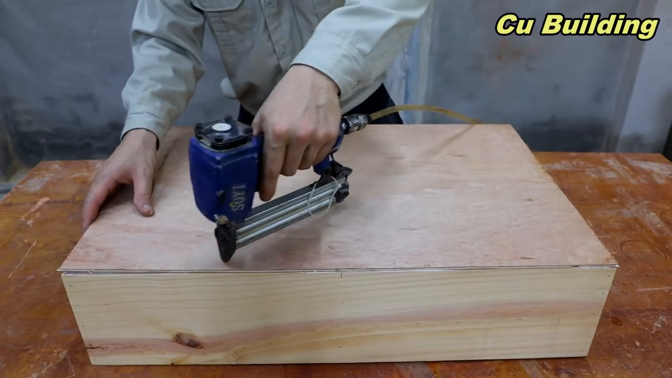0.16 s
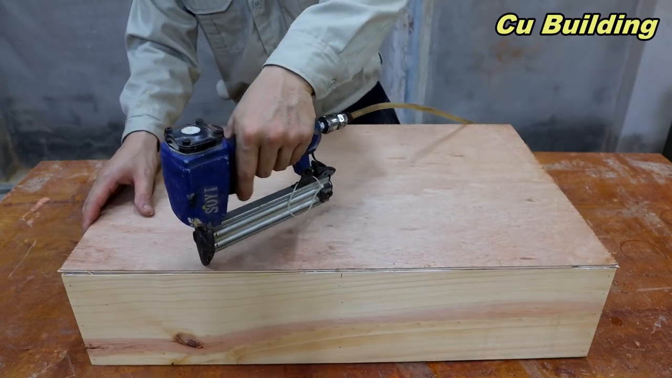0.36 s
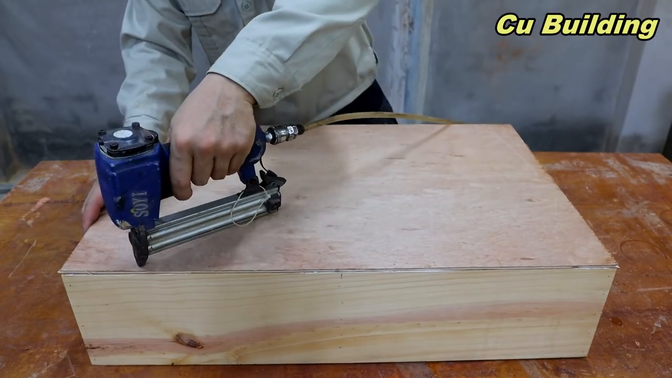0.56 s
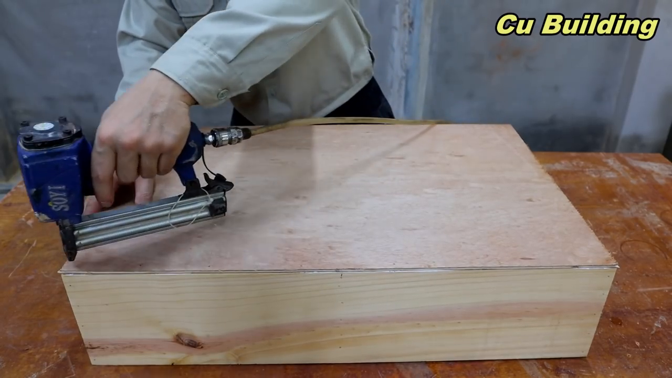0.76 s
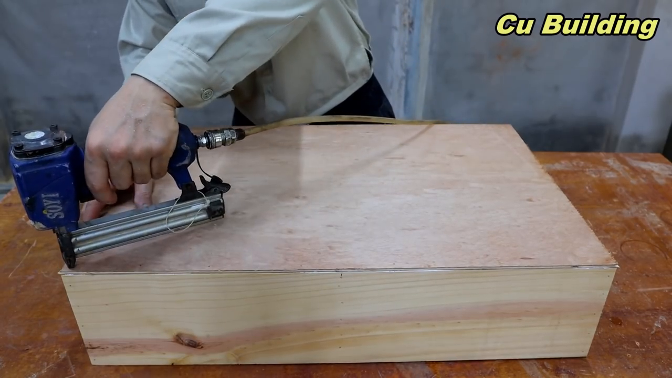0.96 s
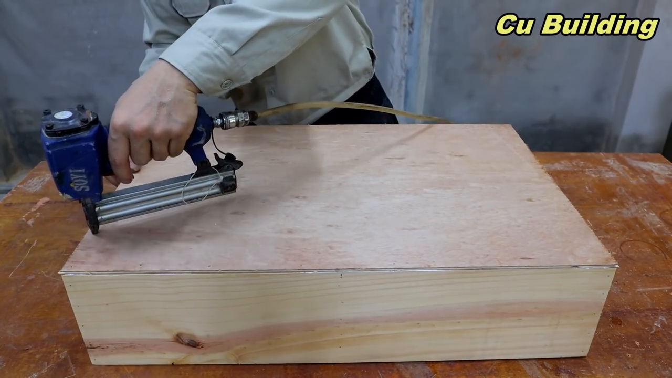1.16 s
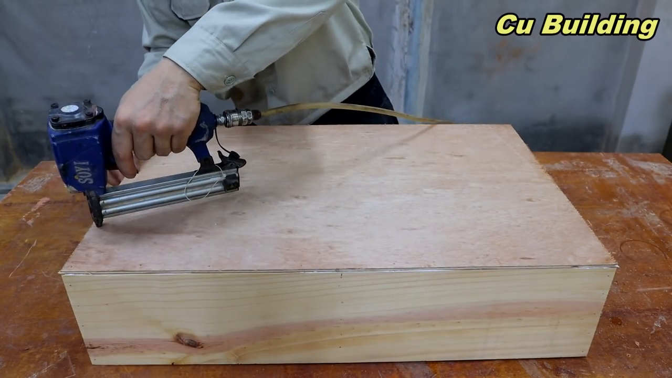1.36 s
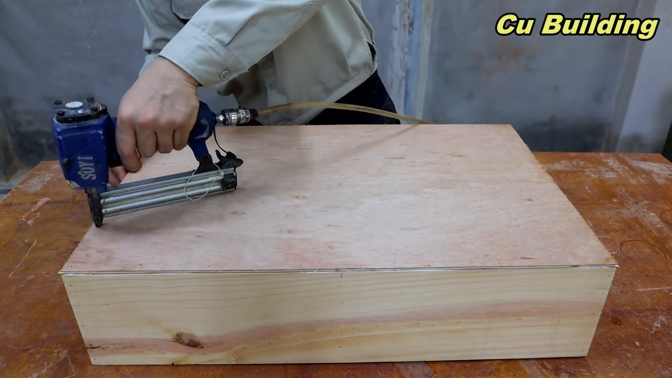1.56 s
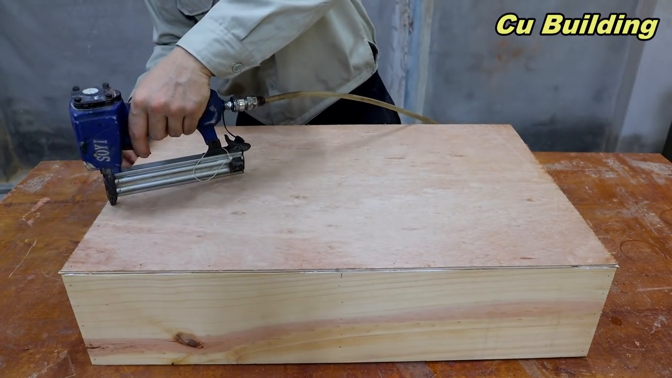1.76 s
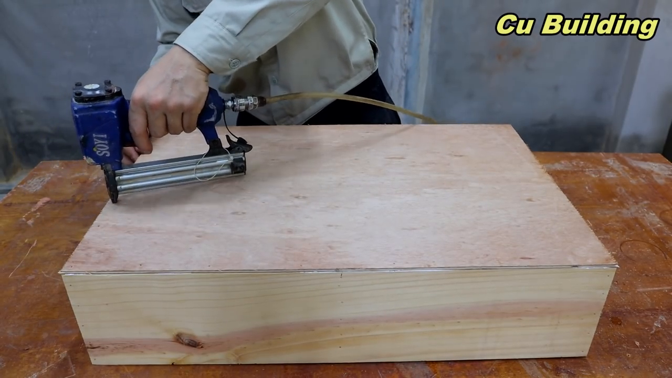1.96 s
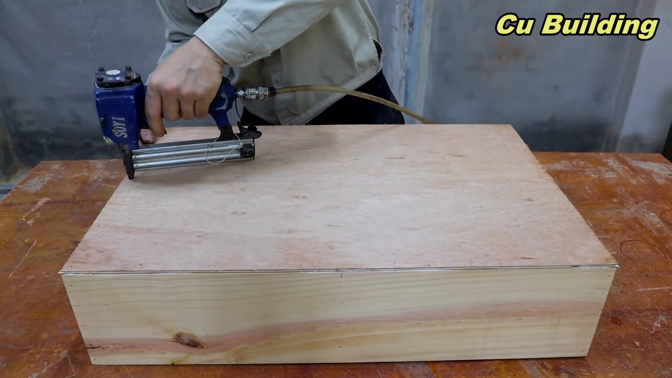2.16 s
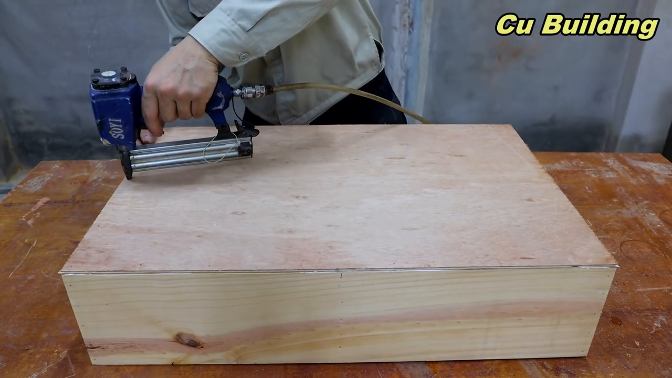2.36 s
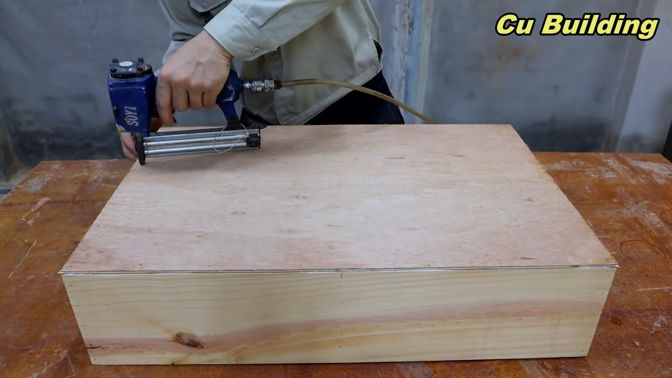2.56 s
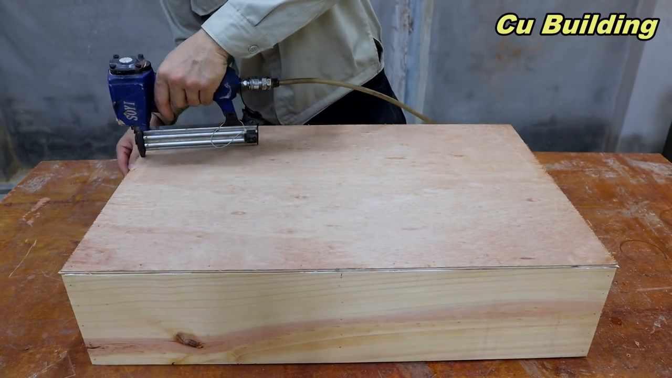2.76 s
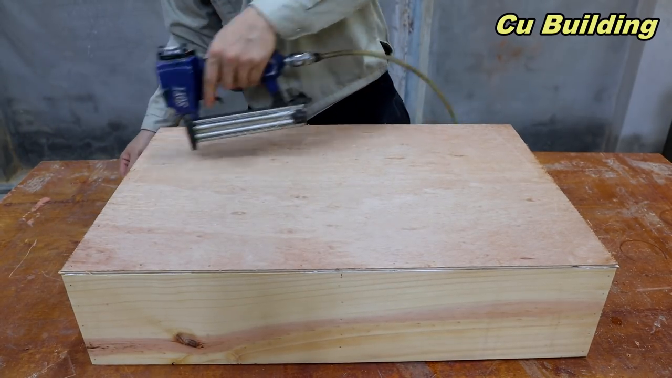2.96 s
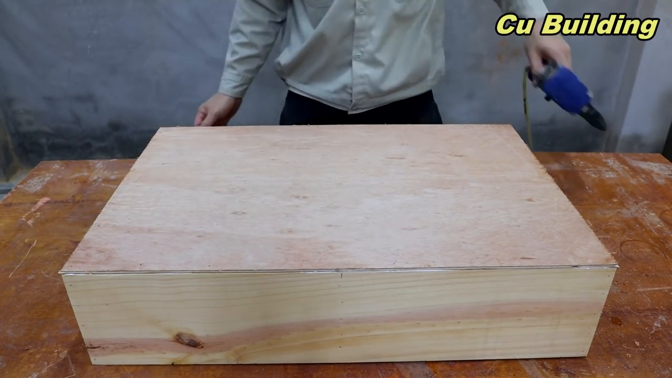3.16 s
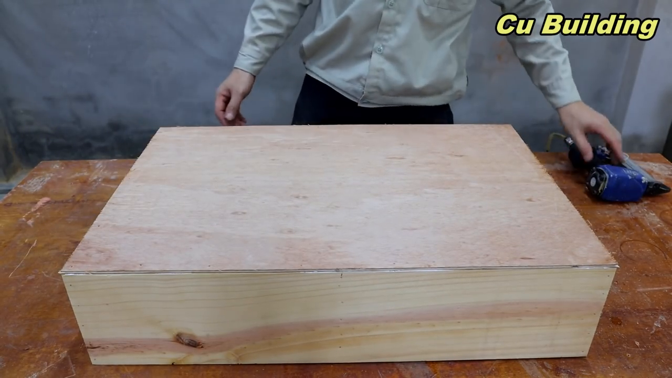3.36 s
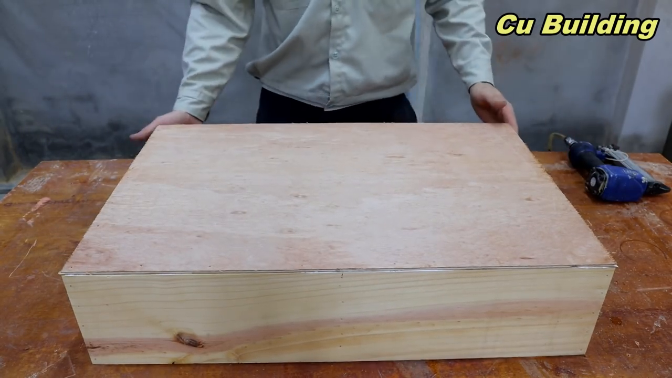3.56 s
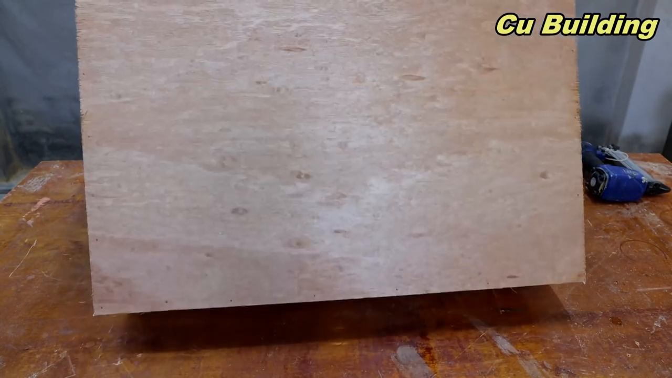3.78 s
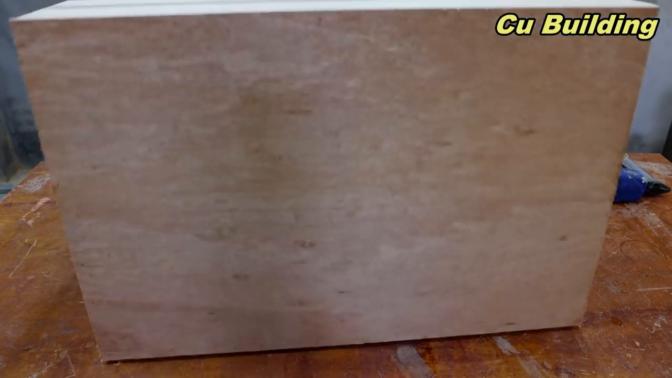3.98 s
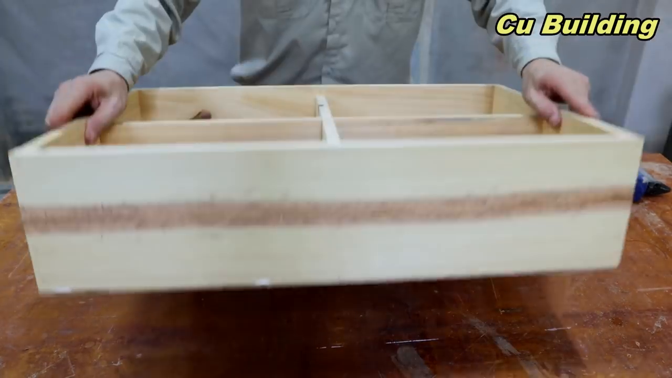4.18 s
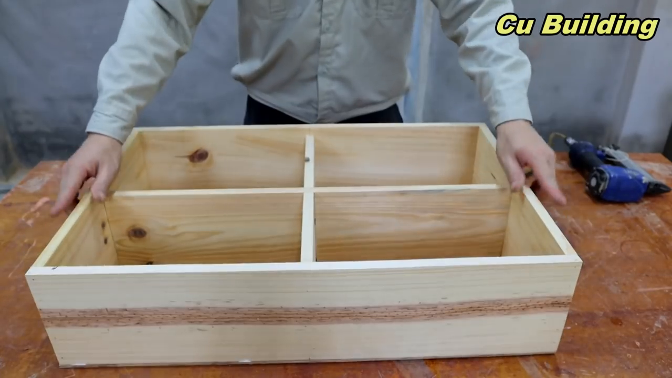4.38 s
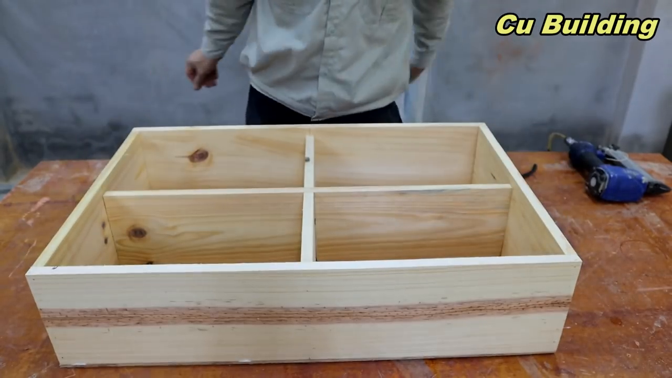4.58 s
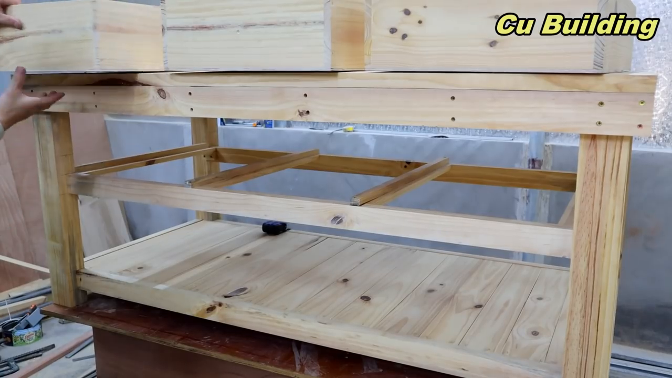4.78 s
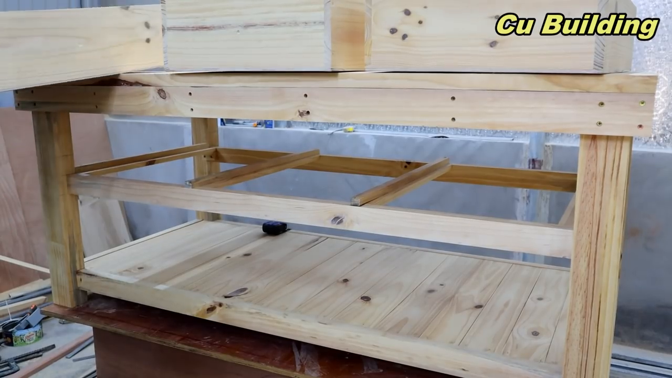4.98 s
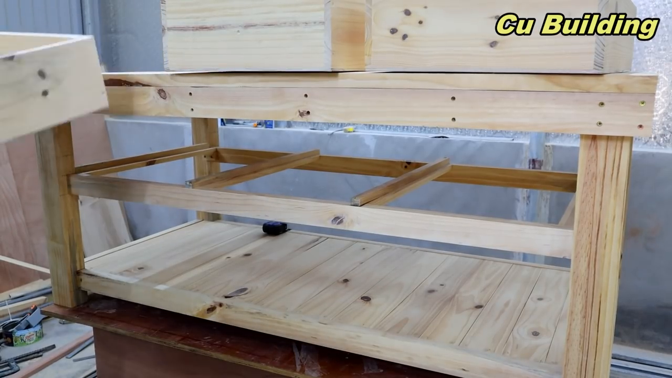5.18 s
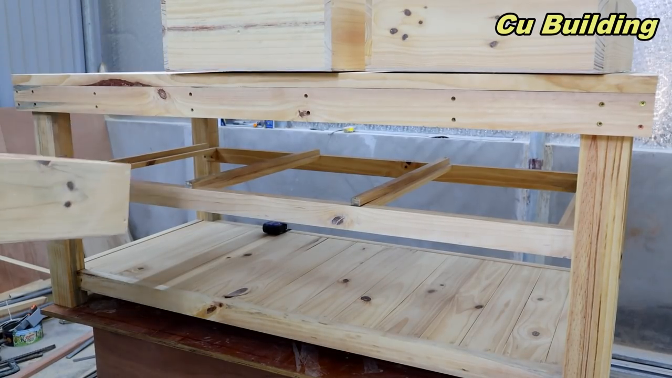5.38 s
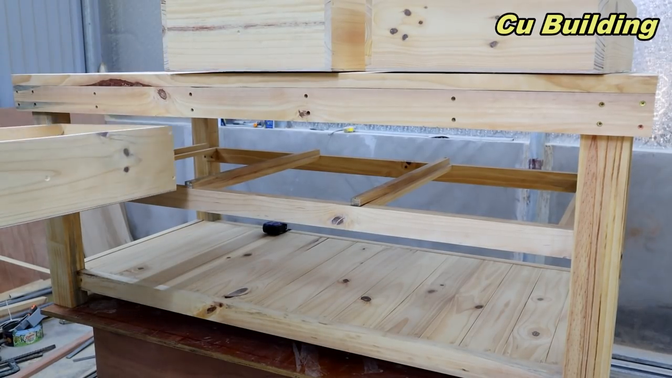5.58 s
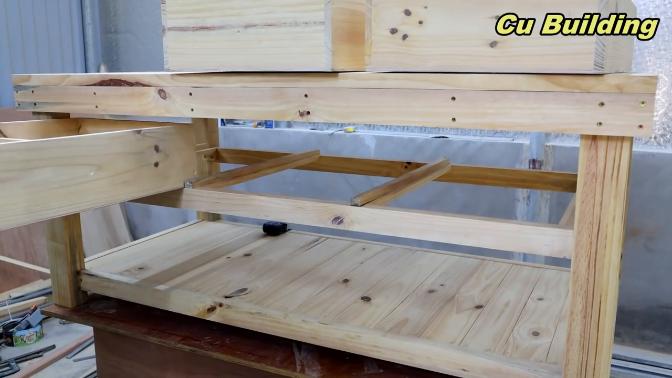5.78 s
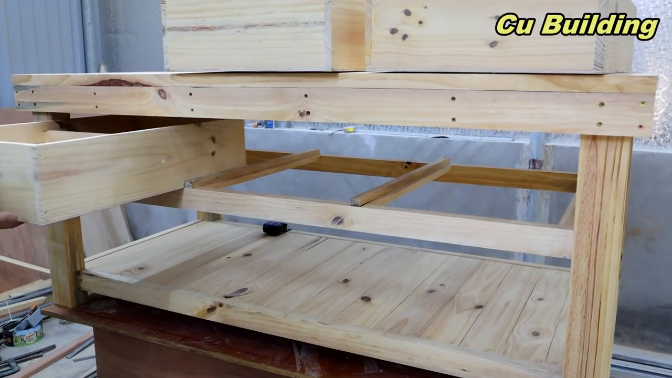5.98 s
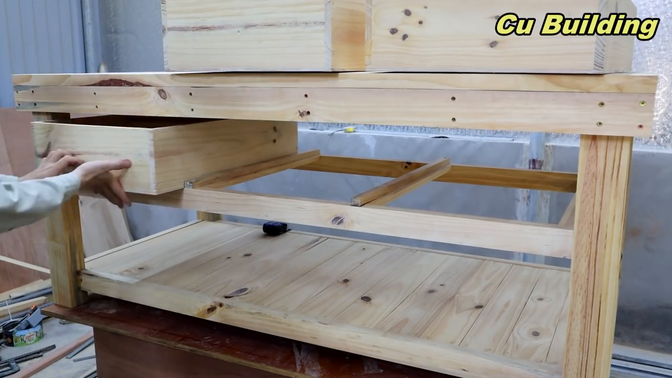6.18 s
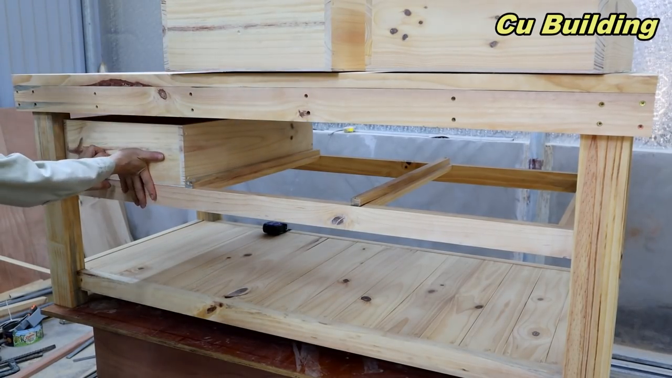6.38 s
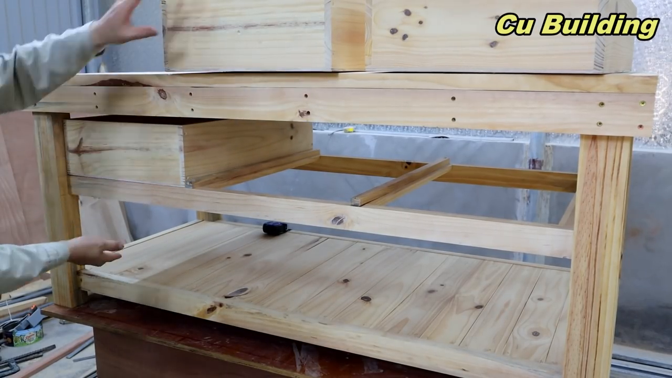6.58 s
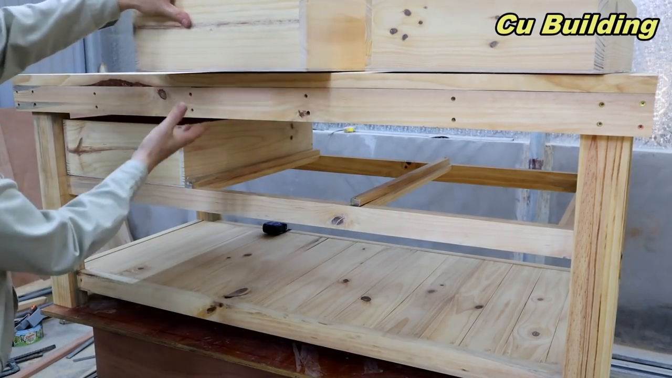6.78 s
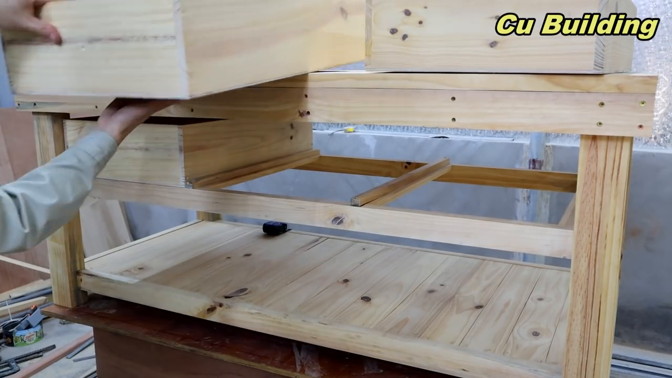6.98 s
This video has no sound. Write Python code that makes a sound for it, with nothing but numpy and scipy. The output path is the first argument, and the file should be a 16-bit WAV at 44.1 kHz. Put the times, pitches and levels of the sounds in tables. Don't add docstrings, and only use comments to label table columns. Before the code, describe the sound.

Eight sharp air-nailer shots crack into a hollow wooden box, then the tool clatters down and a drawer knocks and scrapes into its frame.

```python
import sys
import numpy as np
from scipy import signal
from scipy.fft import rfft, irfft, next_fast_len
from scipy.io import wavfile
from scipy.ndimage import map_coordinates

SR = 44100
rng = np.random.default_rng(int(sys.argv[2]) if len(sys.argv) > 2 else 0)


def waveform_to_disk(signal):
    frames = np.transpose(np.atleast_2d(signal))
    scaled = np.clip(frames, -1, 1) * 32767
    samples = np.round(scaled).astype(np.int16)
    wavfile.write(sys.argv[1], SR, samples)


def undo_db(level):
    steps = np.asarray(level, float) / 20
    return 10 ** steps


N = 310464


def unit(x):
    return x / np.sqrt(np.mean(x[0] ** 2) + 1e-20)


def along(points, hz):
    f, v = np.transpose(points)
    return np.interp(np.log(hz + 1), np.log(f + 1), v)


def filtered(x, response):
    m = next_fast_len(N + 8192)
    spectrum = rfft(x, m) * response(np.fft.rfftfreq(m, 1 / SR))
    return irfft(spectrum, m)[..., :N]


def wobble(rate):
    knots = rng.standard_normal(int(N * rate / SR) + 4)
    return map_coordinates(knots, [np.arange(N) * rate / SR])


def noise(spectrum):
    return unit(filtered(rng.standard_normal((2, N)), lambda hz: undo_db(along(spectrum, hz))))


def modes(table, grain_db):
    grains = rng.standard_normal((2, N)) * undo_db(grain_db * wobble(300))

    def body(f):
        total = 0
        for centre, width, db in table:
            damping = 1j * f * width
            total = total + undo_db(db) * (damping / (centre * centre - f * f + damping)) ** 2
        return total

    return unit(filtered(grains, body))


def bursts(times, db, t60, rise):
    power, t = np.zeros(N + SR), np.arange(SR // 3) / SR
    for s, level, fall in np.broadcast(times, db, t60):
        onset = (1 - np.exp(-t / rise)) ** 2
        power[round(s * SR):][:len(t)] += undo_db(2 * (level - 60 * t / fall)) * onset
    return np.sqrt(power[:N])


def swells(times, db, swell_s, fade_s):
    step = 32
    t = np.arange(0, N, step) / SR - np.asarray(times)[:, None]
    before = np.maximum(swell_s, .005)[:, None]
    after = np.maximum(fade_s, .005)[:, None]
    power = undo_db(-40 * np.abs(t) / np.where(t < 0, before, after))
    return lambda tilt_db: np.sqrt(undo_db(2 * (db + tilt_db)) @ power).repeat(step)[:N]


def strikes(times, db, push_s, hz, t60, ring):
    out, t = np.zeros(N + SR), np.arange(SR // 50) / SR
    shape = ring * np.sin(2 * np.pi * hz * (t - 1.93 * push_s)) * undo_db(-60 * t / t60) * (t > 1.6 * push_s)
    shape = shape - np.exp(-((t - push_s) / (.55 * push_s)) ** 2)
    for s, level in np.broadcast(times, db):
        out[round(s * SR):][:len(t)] += undo_db(level) * shape
    return out[:N] * [[1], [.9]]


def struck(times, db, hz, t60, partners, contact_s):
    out, t = np.zeros(N + SR), np.arange(SR // 5) / SR
    chance = rng.standard_normal((len(times), 2, len(partners)))
    onset = 1 - np.exp(-t / contact_s)
    for (s, level, f, fall), (size, tune) in zip(np.broadcast(times, db, hz, t60), chance):
        for k, (ratio, rel_db) in enumerate(partners):
            decay = undo_db(level + rel_db + 1.5 * size[k] - 60 * t / fall * ratio) * onset
            tone = np.sin(2 * np.pi * f * ratio * (1 + 0.01 * tune[k]) * t)
            out[round(s * SR):][:len(t)] += (-1) ** k * decay * tone
    return out[:N] * [[1], [1.5]]


# (frequency [Hz], density [dB per Hz])
ROOM_COLOUR = [(15, -56), (25, -57), (49, -17.5), (82, -20), (111, -14), (141, -18.5), (270, -0.5),
               (309, -11), (503, -11), (545, -9.5), (624, -11.5), (3620, -21), (7510, -31.5), (16000, -67)]
# (time [s], level [dB])
ROOM_LEVEL = [(0, -44.5), (.85, -47), (1, -43), (1.3, -45), (1.55, -40.5), (2.2, -46.5), (2.45, -42),
              (3.15, -43.5), (3.3, -43.5), (4, -42.5), (5, -39), (7.04, -43.5)]
# (frequency [Hz], level [dB rms])
MOTOR_LINES = [(269, -68), (539, -54), (807, -61)]


def workshop():
    t = np.arange(N) / SR
    s, db = np.transpose(ROOM_LEVEL)
    drift = 0.71 * wobble(5.5)
    hum = 0
    for hz, level in MOTOR_LINES:
        line_db = level + 1.5 + 0.52 * wobble(4.0)
        hum = hum + undo_db(line_db) * np.sin(2 * np.pi * hz * t + drift * hz / 270)
    room = undo_db(np.interp(t, s, db) + 0.16 * wobble(8.3)) * noise(ROOM_COLOUR)
    return room + hum * [[1], [0]]


# (time [s], ring [dB], boom re ring [dB], ring pitch [Hz], click re ring [dB])
CLACKS = [(0.019, -16.5, -5, 702, -15), (0.565, -40, 6, 2500, 14), (0.607, -27, -19, 1070, -3),
          (0.878, -37, -20, 2720, 5), (3.326, -11, -30, 1250, 4), (3.331, -19, -25, 1400, -5),
          (3.339, -8, -13, 890, -2), (3.347, -19, -20, 1550, -2), (3.359, -14.5, -14, 1230, -5),
          (3.37, -19, -19, 890, 1), (3.375, -19, -5, 1600, 0), (3.381, -5, -14, 1000, -6),
          (3.389, -12, -20, 1450, -5), (3.407, -27, -7, 866, -12)]
# (time [s], ring [dB], boom re ring [dB], ring pitch [Hz], loss per rebound [dB])
LANDINGS = [
    (3.613, -9, -14, 1088, 3),
    (4.048, -11.5, 0, 922, 12),
    (4.321, -4, -4, 700, 6),
]
# (time [s], ring [dB], boom re ring [dB], ring pitch [Hz])
ROCKS = [(3.679, -14, -6, 1000), (3.746, -11.5, -9, 570), (4.36, -20, -24, 1070), (4.397, -17, -18, 894),
         (4.378, -14, -27, 900), (4.407, -19, -25, 950), (5.212, -23, -11, 853)]
# (time [s], ring [dB], boom re ring [dB], ring pitch [Hz])
THUDS = [(3.923, -43, 11, 1740), (5.181, -19, 4, 895), (5.465, -28, 8, 750), (5.501, -31, 11, 1333),
         (5.604, -18.5, 3.5, 684), (6.283, -21.5, 3.5, 700), (6.402, -17.5, 5.5, 690),
         (6.416, -13, -10, 650), (6.52, -26, -8, 610), (6.625, -18, 1.5, 660), (6.749, -22, -5, 610)]
# (time [s], ring
# [dB], boom re ring [dB], ring pitch [Hz], click re ring [dB])
RAPS = [(4.333, -12, -20, 1200, -14), (4.3427, -7, -3, 1000, -10), (5.539, -24, -10, 678, -1.5),
        (5.547, -21, -1, 583, -11), (5.7265, -6, -20, 700, -9), (5.73, -12, -28, 1577, -16),
        (5.735, -6, -40, 844, -30), (5.738, -8.5, -40, 723, -32), (5.782, -13, -42, 870, -4),
        (5.789, -3, -22, 850, -9), (5.797, -10, -39, 1000, -12), (5.82, -13, -32, 860, -18),
        (5.842, -13.5, -14, 850, -8), (5.853, -16, -12, 836, -19), (5.87, -19, -20, 708, -24),
        (5.962, -19, -5.5, 650, 2), (5.973, -15.5, -15, 1088, -16), (6.024, -21, -10, 872, -6),
        (6.045, -24, -7, 872, -16), (6.307, -9, -17, 813, -12), (6.315, -5.5, -17, 760, -26),
        (6.885, -20.5, -13, 945, -30), (6.928, -22, -29, 986, -22)]
CLACK_T60, LANDING_T60, THUD_T60, RAP_T60 = .11, 0.12, 0.037, 0.15
LANDING_CLICK_DB, REBOUND_CLICK_DB, THUD_CLICK_DB = -12, -39, -41


def contacts():
    first_gap_s, gap_growth, first_loss_db, chatter_hz = .012, 1.2, 13.5, 1043
    rows = [(*row, CLACK_T60) for row in CLACKS]
    rows += [(*row, THUD_CLICK_DB, THUD_T60) for row in THUDS]
    rows += [(*row, RAP_T60) for row in RAPS]
    rows += [(*row, LANDING_CLICK_DB, LANDING_T60) for row in ROCKS]
    rebounds = np.cumsum(first_gap_s * gap_growth ** np.arange(5))
    for s, db, boom_db, hz, loss_db in LANDINGS:
        rows.append((s, db, boom_db, hz, LANDING_CLICK_DB, LANDING_T60))
        for k, later in enumerate(rebounds):
            left_db = db - first_loss_db - loss_db * k
            rows.append((s + later, left_db, min(boom_db, 0), chatter_hz, REBOUND_CLICK_DB, 2.0 * LANDING_T60))
    return np.transpose(rows)


# (frequency ratio, level [dB])
PARTNERS = [(0.998, 2.5), (1.037, -4.5), (0.838, -4.5), (1.282, -14.5), (1.8, -10.5), (2.6, -25)]
# (frequency ratio, level [dB])
BEATING = [(1, 0), (.976, -7), (1.035, -8), (1.3, -10)]
# (frequency [Hz], width [Hz], level [dB])
PANEL_BOOM = [(357, 63, -1), (542, 44, -6.5)]
# (frequency [Hz], width [Hz], level [dB])
DRAWER = [(666, 244, 1.5), (833, 144, -1), (1070, 43, -3), (1312, 180, -5), (1514, 220, -12),
          (2388, 140, -13)]
# (frequency [Hz], density [dB per Hz])
CLICK_COLOUR = [(300, -95), (1000, 10), (1800, 4), (3500, -3.5), (7500, -18), (10000, -37.5), (16000, -72)]
# (time [s], level [dB], pitch [Hz], t60 [s], modes as (frequency ratio, level [dB]))
SPLINTER = (6.187, -21, 1860, .11, [(1, 0), (1.04, -8), (3.2, -16)])


def knocks():
    s, db, boom_db, hz, click_db, t60 = contacts()
    t60 = np.clip(t60, .02, .6)
    low_modes = [(1, 9.5), (1.3, 5.0), (0.704, -10)]  # (frequency ratio, dB)
    boom = struck(s, db + boom_db - 11.0, 366.4, 0.69 * t60, low_modes, contact_s=0.00083)
    ring = struck(s, db - 2.5, hz, 0.26 * t60, PARTNERS, contact_s=0.00057)
    ring += struck(s, db - 21.5, hz, 2.5 * t60, BEATING, contact_s=0.0011)
    after_boom = bursts(s, db + boom_db - 9.0, 2 * t60, rise=0.00098)
    after = after_boom * modes(PANEL_BOOM + [(263, 82, -2)], grain_db=-9.0)
    after += bursts(s, db - 14.5, 1.87 * t60, rise=0.0007) * modes(DRAWER, grain_db=1.5)
    click = bursts(s, db + click_db + 0.5, 0.0083, rise=0.00032)
    click += bursts(s, db + click_db - 11.5, 1.7 * t60, rise=0.0024)
    first_touch = strikes(s, db + .8 * click_db - 5, push_s=0.0002, hz=2600, t60=0.004, ring=0.5)
    splinter = struck([SPLINTER[0]], *SPLINTER[1:], contact_s=0.00043)
    return boom + ring + after + first_touch + click * noise(CLICK_COLOUR) + splinter


# (valve opens [s], driver hits [s], piston slams home [s])
SHOTS = [(.0495, .0588, .1114), (.3517, .3601, .4142), (.6159, .6230, .6771), (.9946, 1.0033, 1.0653),
         (1.5634, 1.5711, 1.6384), (1.9469, 1.9535, 2.0155), (2.4843, 2.4919, 2.5464),
         (2.8797, 2.8886, 2.9462)]
# (blow [dB], panel boom [dB], panel ring [dB], exhaust [dB])
FORCE = [(-8, -26, -36, -13), (-7.5, -24, -32, -13.5), (-9, -29, -20, -13), (-8, -25, -15, -14),
         (-7.5, -18, -19, -12.5), (-8.5, -17.5, -19.5, -14.5), (-9, -16.5, -19, -10.5),
         (-8, -18.5, -22, -14)]
# (frequency [Hz], density [dB per Hz])
VALVE_COLOUR = [(180, -47), (300, -1), (2610, -6.5), (3240, -6), (4370, -6), (4990, -1), (8790, -2),
                (11700, -16), (16000, -10)]
# (frequency [Hz], density [dB per Hz])
RATTLE_COLOUR = [(150, -80), (600, -7), (1500, -2), (4200, -2.5), (6000, 3), (8000, -5), (10500, -19),
                 (13000, -15), (16000, -18)]
# (frequency [Hz], density [dB per Hz])
EXHAUST_COLOUR = [(120, -49), (200, -33), (671, 5), (1980, -64), (3970, -4.5), (6280, 1.5), (9580, -3.5),
                  (11100, -17), (15100, -8), (16000, -28)]


def nailer():
    opens, s, home = np.transpose(SHOTS)
    blow_db = np.transpose(FORCE)[0]
    valve = bursts(opens, blow_db - 9.5, 0.037, rise=0.0005) * noise(VALVE_COLOUR)
    blow = strikes(s, blow_db + 2.5, push_s=0.00018, hz=4530, t60=0.0035, ring=3.06)
    rattle = bursts(s + 0.000846, blow_db + 2, 0.0067, rise=0.000067) * noise(RATTLE_COLOUR)
    vent = bursts(home - .0055, blow_db - 9.5, 0.089, rise=0.00045)
    vent += bursts(home, blow_db - 5, .01, rise=.0003)
    clicks = strikes(home - .0069, blow_db + 2, push_s=0.00011, hz=4840, t60=0.0029, ring=0.99)
    clicks += strikes(home - .0041, blow_db - 6.5, push_s=0.00009, hz=6550, t60=0.0043, ring=2.7)
    clicks += strikes(home - .0003, blow_db + 2.5, push_s=.00015, hz=3400, t60=.005, ring=1.8)
    clicks = filtered(clicks, lambda f: 1j * f / (250 + 1j * f))
    return valve + blow + rattle + vent * noise(EXHAUST_COLOUR) + clicks


# (frequency [Hz], density [dB per Hz])
BLOW_TAIL = [(60, -60), (120, -20), (250, -7), (600, -3), (1100, 1), (1800, -8.5), (4500, -4), (6500, -8.5),
             (8500, -13), (11500, -24), (16000, -34)]
# (frequency [Hz], density [dB per Hz])
AIR_TAIL = [(60, -53), (120, -26), (250, -6.5), (600, -8.5), (1000, -13.5), (1600, -18), (3200, -11),
            (5500, -18), (8000, -25.5), (11500, -41), (16000, -39)]
# (frequency [Hz], width [Hz], level [dB])
PANEL_RING = [(719.5, 50, 10.5), (872, 150, 1), (1158, 34, 1), (1980, 660, -0.5)]
# (boom pitch [Hz], boom t60 [s], second shake re boom [dB], middle mode [Hz], middle mode level [dB])
PANEL = [(355, .26, 1, 950, -26), (355, .26, 0, 800, -24), (365, .22, 3, 720, -25),
         (363, 0.19, 0, 540, -17), (368, .24, -4, 870, -19), (360, .24, -3, 960, -21),
         (352, .26, -2, 720, -26), (355, .22, 0, 1280, -22)]


def answer():
    _, s, home = np.transpose(SHOTS)
    blow_db, boom_db, ring_db, air_db = np.transpose(FORCE)
    build_s, drum_s = .0025, .009
    room = bursts(s, blow_db - 7.5, 0.3, build_s) * noise(BLOW_TAIL)
    leak = bursts(home - .024, air_db - 7, 0.14, rise=0.012)
    air = (leak + bursts(home - .004, air_db - 6.5, 0.33, build_s)) * noise(AIR_TAIL)
    both = np.r_[s, home]
    boom_hz, boom_t60, again_db, middle_hz, middle_db = np.transpose(PANEL)
    boom_t60 = np.tile(np.clip(boom_t60, .05, .3), 2)
    both_db = np.r_[boom_db, boom_db + again_db]
    boom = bursts(both, both_db - 3, boom_t60, drum_s) * modes(PANEL_BOOM, grain_db=5)
    boom += struck(both, both_db + 1.5, np.tile(boom_hz, 2), boom_t60, BEATING, drum_s)
    ring = bursts(both, np.r_[ring_db - 3, ring_db - 8], 0.19, build_s) * modes(PANEL_RING, grain_db=5.0)
    ring += struck(s, ring_db + 2.0, 1125, 0.19, BEATING, build_s)
    ring += struck(s, middle_db, middle_hz, 0.15, BEATING, build_s)
    return room + air + boom + ring


# (time [s], level [dB], pitch [Hz], t60 [s])
SNAPS = [(3.3254, -19, 5160, 0.0091), (3.34, -20.5, 6500, 0.0087), (3.382, -26, 4760, 0.0074),
         (3.6121, -35, 4800, 0.0046), (4.048, -15, 1400, 0.025), (4.049, -29, 5050, .006),
         (4.08, -39, 9100, 0.011), (4.5, -34, 4800, .012), (4.071, -24, 1330, .015),
         (6.182, -21, 3100, 0.013), (7.3, -25, 5400, .008), (3.371, -24, 3900, .008),
         (3.3415, -22, 4000, .01), (5.962, -25, 580, .04), (6.317, -18, 900, 0.018),
         (4.3209, -25, 7400, 0.0093), (4, -28, 2900, 0.0041), (5.726, -14, 1050, 0.027),
         (5.963, -22.5, 2700, 0.026), (6.195, -23, 600, .04)]
# (frequency ratio, level [dB])
EDGE_MODES = [(1, 0), (1.37, -10), (1.9, -14)]


def snaps():
    home, blow_db = np.transpose(SHOTS)[2], np.transpose(FORCE)[0]
    piston = struck(home - .005, blow_db - 7.5, 510, 0.042, EDGE_MODES[:1], contact_s=0.00079)
    return piston + struck(*np.transpose(SNAPS), EDGE_MODES, contact_s=.0001)


# (time [s], level [dB], swell [s], fade [s])
RUSTLES = [
    (3.33, -55, .01, 0.091),
    (3.72, -59, .2, 0.073),
    (4.082, -53, .015, 0.041),
    (4.33, -64, .01, .05),
    (5.6, -52, .015, .08),
    (6.62, -51, .04, .06),
]


def sleeves():
    colour = [(6000, -30), (11000, -4), (14000, -4), (16000, -2)]  # (Hz, dB per Hz)
    return (undo_db(-80) + swells(*np.transpose(RUSTLES))(0)) * noise(colour)


# (time [s], level [dB], pitch [Hz], t60 [s])
DRUMS = [(3.333, -16.5, 340, 0.15), (3.343, -11, 370, 0.12), (3.374, -12.5, 358, 0.14),
         (3.614, -20, 350, 0.35), (3.614, -18, 787, .1), (3.748, -23, 560, 0.21), (3.68, -25, 350, .1),
         (4.0488, -6, 403, .025), (4.051, -11.5, 354, 0.18), (4.052, -20, 250, .12), (4.05, -19, 535, 0.14),
         (4.062, -25, 560, .06), (4.322, -12, 300, .04), (4.344, -17, 400, .05), (4.368, -20, 330, 0.08),
         (5.79, -15.5, 417, 0.23), (5.844, -24, 404, .15), (6.31, -14, 559, 0.15), (6.316, -11, 367, 0.11),
         (6.345, -24, 790, 0.093), (6.884, -16, 285, 0.027), (6.885, -21, 560, 0.05),
         (6.925, -22, 560, 0.056), (7.015, -22.5, 1615, .07)]
# (frequency ratio, level [dB])
SIDE_PANEL = [(1, 0), (1.024, -1)]


def drums():
    return struck(*np.transpose(DRUMS), SIDE_PANEL[:1] + [(1.06, -12)], contact_s=0.0018)


# (time of full speed [s], scrape [dB], swell [s], fade [s], weight [dB])
STROKES = [(3.45, -45.5, 0.075, 0.11, 7), (3.64, -43, 0.016, 0.49, -3), (3.757, -27, 0.13, 0.069, 0),
           (3.95, -44.5, 0.058, 0.79, 3.5), (4.08, -45, 0.026, 0.017, -9), (4.33, -28, 0.015, 0.03, 6),
           (4.638, -43.5, .03, 0.2, -8), (4.837, -27, 0.13, 0.34, -3.5), (5.072, -26.5, 0.082, 0.16, -3),
           (5.185, -43.5, 0.15, 0.072, 14.5), (5.16, -40, .06, .12, -11), (5.26, -44, 0.13, 0.15, -12.5),
           (5.35, -49, 0.097, .08, -15.5), (5.559, -40, 0.12, 0.035, -6), (5.455, -42, 0.028, 0.032, -12.5),
           (5.42, -42, 0.24, 0.19, 5.5), (5.592, -38, 0.0068, 0.083, -17.5), (5.68, -44.5, 0.87, 0.3, 2.5),
           (5.85, -39, 0.026, 0.063, 14), (5.97, -35, 0.059, 0.036, 4), (5.93, -44, 0.023, 0.11, -10),
           (6.13, -46, 0.2, 0.063, -14), (6.184, -32.5, 0.011, 0.049, -1.5), (6.04, -45, 0.2, 0.41, 15),
           (6.26, -33.5, 0.37, 0.27, -2.5), (6.55, -48, 0.57, 0.52, -3), (6.62, -46.5, 0.049, 0.059, -20.5),
           (6.84, -31.5, 0.079, 0.33, -6), (7.0, -33.5, 0.61, 0.76, -2)]
# (time [s], rumble [dB], swell [s], fade [s])
LURCHES = [(4.06, -38, 0.03, 0.088), (4.32, -43, 0.11, .12), (5.181, -45.5, 0.08, 0.4),
           (5.46, -35.5, 0.075, 0.11), (5.6, -38.5, 0.032, 0.13), (5.97, -45, .06, 0.076),
           (6.29, -37, 0.17, 0.095), (6.409, -37, 0.033, 0.042), (6.68, -59, .3, .3)]
# (frequency [Hz], density [dB per Hz])
RUMBLE_COLOUR = [(30, -32), (60, -6), (110, 8.5), (200, 3.5), (300, -39), (600, -92)]
# (frequency [Hz], width [Hz], level [dB])
BOARDS = [(370, 160, 4), (558, 116, 7.5), (829, 274, 6), (1075, 210, 4.5), (1400, 350, 1.5),
          (1830, 180, -8)]
# (frequency [Hz], width [Hz], level [dB])
GRAIN = [(384, 80, 6.5), (1008, 57, 6.5), (1787, 110, 3), (2115, 110, 2.5)]
# (frequency [Hz], density [dB per Hz])
SCRAPE_COLOUR = [(250, -84), (900, 1.5), (1800, 2.5), (3000, 1), (5000, -4), (7000, -58), (12000, -70)]
# (frequency [Hz], density [dB per Hz])
FIBRE_COLOUR = [(1000, -90), (3500, -8), (5500, 0.5), (8000, -6.5), (11000, -18.5), (13000, -25),
                (15500, -26)]


def slide():
    fine_db, board_db, drag_db = -8, -2, -39
    s, db, swell_s, fade_s, weight_db = np.transpose(STROKES)
    speed = swells(s, db, swell_s, fade_s)
    catch = wobble(45)
    load = swells(*np.transpose(LURCHES))(0) + speed(drag_db)
    rumble = load * undo_db(3 * wobble(25)) * noise(RUMBLE_COLOUR)
    wood = speed(board_db + weight_db) * undo_db(0.24 * catch) * modes(BOARDS, grain_db=1.5)
    wood += speed(weight_db - 6) * modes(GRAIN, grain_db=1.5)
    roughness = undo_db(1.1 * catch + 2.2 * wobble(500))
    hiss = speed(0) * noise(SCRAPE_COLOUR) + speed(fine_db - weight_db) * noise(FIBRE_COLOUR)
    return rumble + wood + roughness * hiss


# (frequency ratio, level [dB])
RAIL = [(1, -0.5), (1.42, 2)]


def bumps():
    s, db, boom_db, _ = np.transpose(THUDS)
    shove = strikes(s, db + np.minimum(boom_db, 0) - 6, push_s=0.00217, hz=303, t60=0.054, ring=0.54)
    shove = filtered(shove, lambda f: (1j * f / (120 + 1j * f)) ** 2)
    s, db, boom_db = np.transpose(RAPS)[:3]
    free_db = -8 * (boom_db > -16)
    side = struck(s, db + free_db - 16, 843, .33, SIDE_PANEL, contact_s=.002)
    land_s, land_db, low_db = np.transpose(LANDINGS)[:3]
    bench = struck(land_s, land_db + low_db - 21, 276, 0.14, BEATING, contact_s=0.002)
    rail = struck(s, db - 20.0, 1573, 0.048, RAIL, contact_s=0.00035)
    return shove + bench + rail + side


# (time of full voice [s], level [dB], pitch [Hz], half length [s])
SONGS = [(3.675, -39, 1850, .03), (3.72, -28, 1130, 0.094), (3.739, -22.5, 560, 0.028),
         (3.762, -29, 1573, 0.033), (3.784, -29, 370, 0.044), (4.83, -29.5, 1007, .04),
         (4.844, -34, 1950, .025), (4.88, -32, 381, 0.04), (4.934, -31, 2000, 0.056),
         (4.975, -36.5, 370, .05), (5.074, -24.5, 1796, 0.02), (5.11, -31.5, 870, 0.033),
         (5.15, -35, 1540, 0.016), (5.183, -24, 877, 0.033), (5.187, -24, 540, 0.04),
         (5.19, -27, 400, .035), (5.887, -27, 846, .05), (5.98, -32, 660, 0.034), (6.065, -30, 410, 0.096),
         (6.835, -34, 940, .04), (6.92, -31, 1000, .02), (6.997, -34, 1240, 0.051)]


def singing():
    out, waver, flutter = np.zeros(N + SR), wobble(60), undo_db(1.6 * wobble(50))
    for s, db, hz, half_s in SONGS:
        i = np.arange(round((s - half_s) * SR), min(round((s + half_s) * SR), N))
        swell = np.cos(np.pi / 2 * (i / SR - s) / half_s) ** 2
        tone = np.sin(2 * np.pi * hz * i / SR + 1.2 * waver[i])
        out[i] += undo_db(db) * swell * flutter[i] * tone
    return out[:N] * [[1], [1]]


# (frequency [Hz], side minus mid [dB])
WIDTH = [(60, -23), (110, -29), (200, -35), (380, -31.5), (700, -24), (1290, -25), (2380, -9.5),
         (4400, -6.5), (8120, 0), (15000, 11)]
# (frequency [Hz], left minus right [dB])
LEAN = [(30, 3), (80, -0.3), (200, 0), (700, -0.3), (2000, -0.6), (5000, 0.5), (9000, -2.5), (14000, -2)]


def ports(pair, narrow_db):
    mid, other = pair

    def width(hz):
        return undo_db(along(WIDTH, hz) - narrow_db * hz / 16000)

    def turned(hz):
        return .4j * width(hz) + along(LEAN, hz) * np.log(10) / 40

    side = filtered(other, lambda hz: 0.68 * width(hz)) + filtered(mid, turned)
    return np.array([mid + side, mid - side])


def scene():
    front = ports(nailer(), narrow_db=4.5)
    around = answer() + knocks() + bumps() + drums() + singing() + slide()
    around = around + workshop() + sleeves() + snaps()
    return front + ports(around, narrow_db=-2.0)


def ducking(times, depth_db, attack_s, db_per_s):
    t = np.arange(N) / SR - np.asarray(times)[:, None]
    dive = np.clip(t / attack_s, 0, 1) ** 3 * np.maximum(depth_db - db_per_s * t, 0)
    return dive.max(axis=0)


def low_pass(x):
    return signal.sosfilt(signal.butter(12, 16850, fs=SR, output="sos"), x)


# (time [s], depth [dB])
DIVES = [
    (3.33, 3.5),
    (3.385, 4.5),
    (4.052, 3),
    (4.326, 8),
    (4.347, 4),
    (5.741, 6.5),
    (5.803, 5),
    (6.334, 4.5),
]


def record(dry):
    _, s, home = np.transpose(SHOTS)
    down_db = ducking(s, depth_db=12.0, attack_s=0.0046, db_per_s=258)
    down_db += ducking(home, depth_db=11.5, attack_s=0.00081, db_per_s=258)
    dive_s, dive_db = np.transpose(DIVES)
    down_db += ducking(dive_s, dive_db[:, None], attack_s=0.0025, db_per_s=159)
    x = dry * undo_db(-down_db)
    x = x / (1 + np.abs(x / .66) ** 5) ** (1 / 5)
    top_hz, softness_hz = 15800, 45
    mix = filtered(x, lambda hz: undo_db(-12.5 - 12.43 * np.tanh((hz - top_hz) / softness_hz)))
    return low_pass(mix)


dry = scene()
out = record(dry)
waveform_to_disk(out)
```